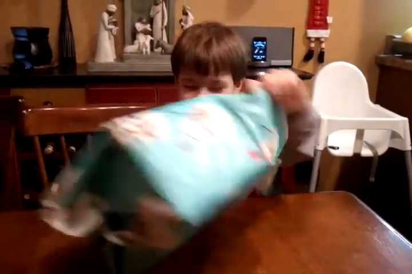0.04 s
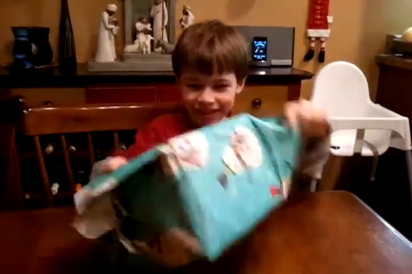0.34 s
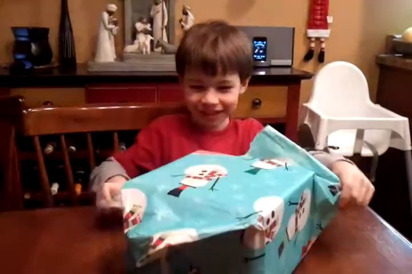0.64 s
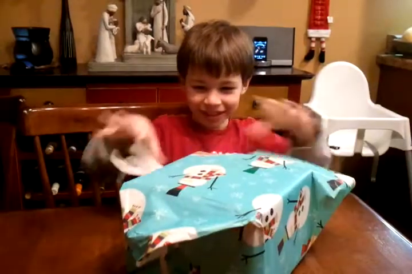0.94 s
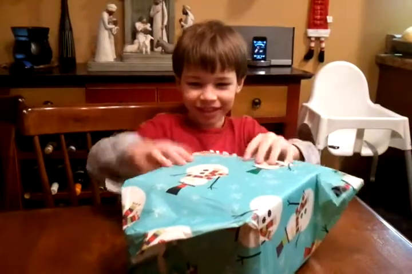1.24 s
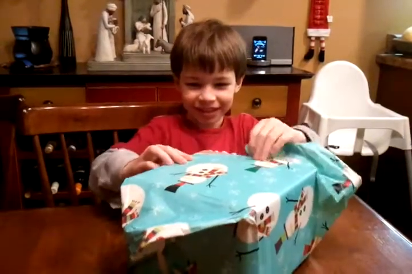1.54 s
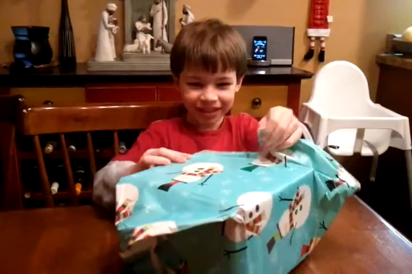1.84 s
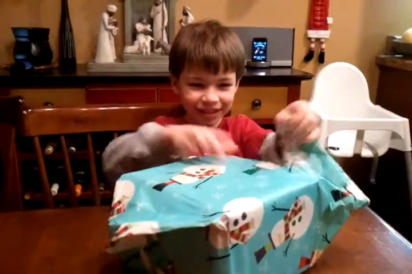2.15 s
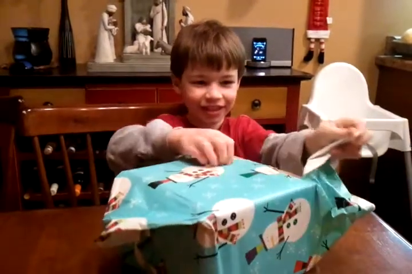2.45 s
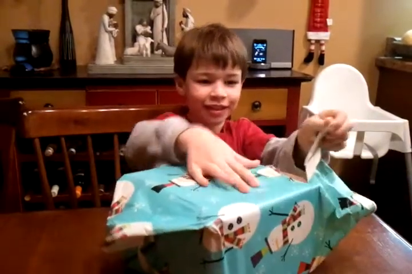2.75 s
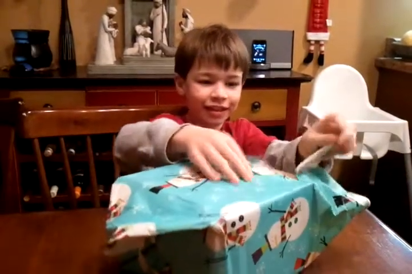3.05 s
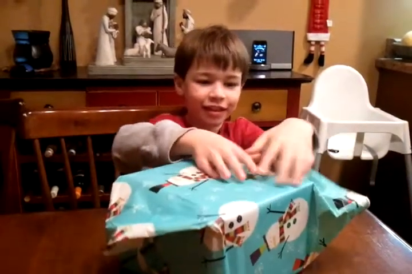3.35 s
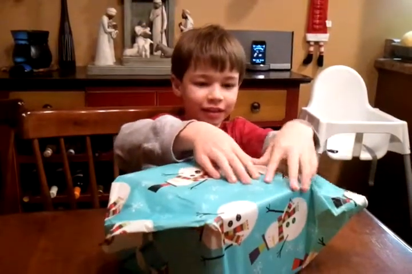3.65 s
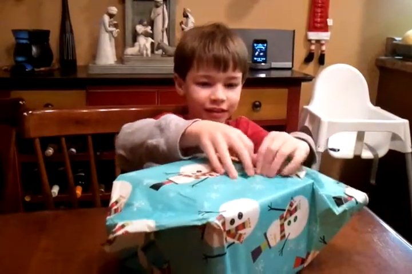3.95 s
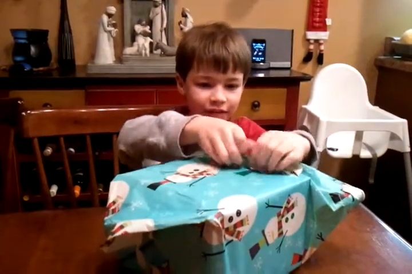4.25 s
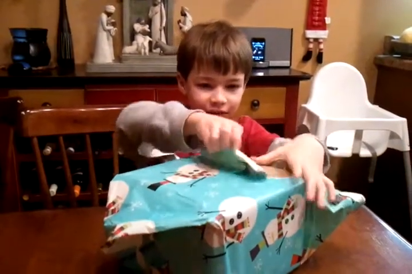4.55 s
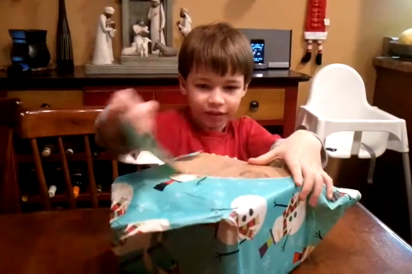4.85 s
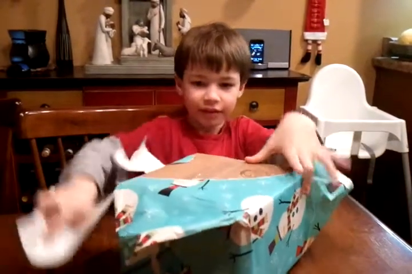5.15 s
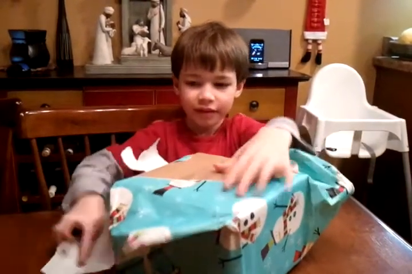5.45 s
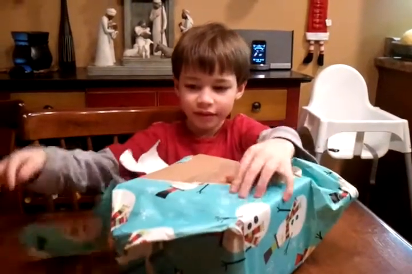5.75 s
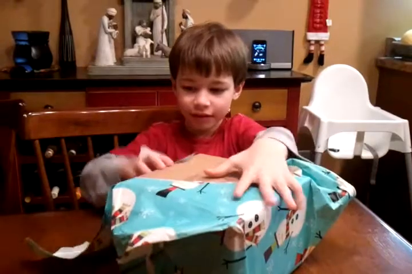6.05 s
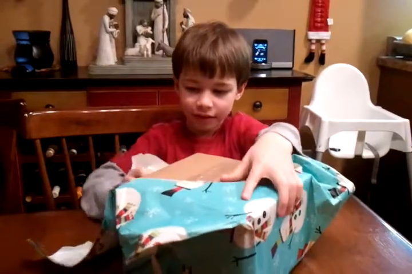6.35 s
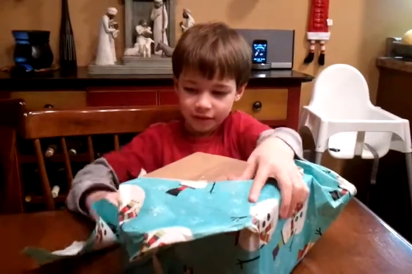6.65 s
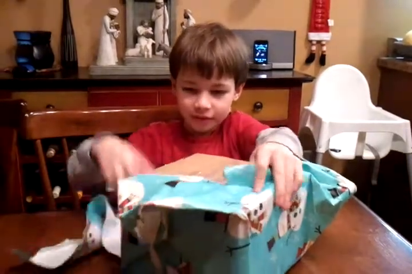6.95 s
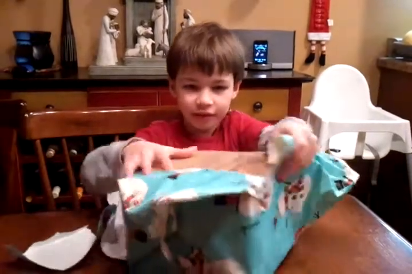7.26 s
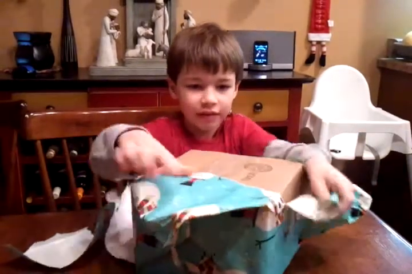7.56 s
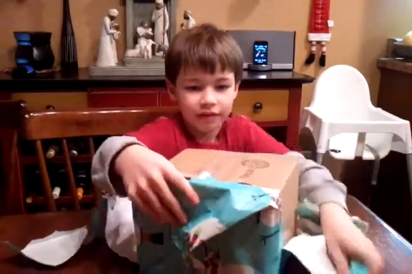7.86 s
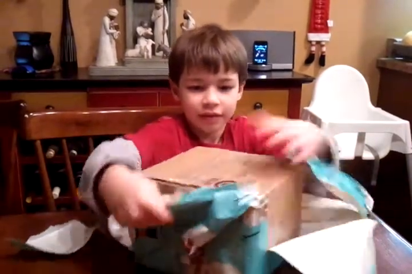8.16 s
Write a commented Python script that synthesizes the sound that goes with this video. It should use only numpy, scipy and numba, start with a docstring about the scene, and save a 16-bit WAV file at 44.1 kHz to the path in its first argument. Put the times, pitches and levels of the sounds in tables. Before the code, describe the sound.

Wrapping paper is torn off a cardboard box on a wooden table, heard fairly close in a room with a short ring. Rips fill the first 0.7 seconds, with a hollow knock at about 0.3. From 1 to 4 seconds the paper crinkles and pops between shorter tears, while the box bumps lightly and rubs on the tabletop. Near 3 seconds fingertips give three tiny, faint squeaks. A long tear builds from 4.3 seconds and peaks around 5.3, over the low groan of the sliding box. Softer rustling follows. From 6.4 to 8.2 seconds come the loudest pops and several strong rips, with a very sharp crack near 6.9. A last short push and a knock end it at about 8.3 seconds. A faint low rumble and hum lie underneath throughout.

```python
"""A gift box is unwrapped on a wooden dining table, in a room that rings briefly. First a knock sets the
cardboard modes ringing and the paper rips, its fibres snapping in dense runs. Creases pop between
shorter rips; near 3 s fingertips squeak by stick-slip. A long tear follows from 4.3 s while the box
slides and the tabletop resonates. The loudest pops and more rips fill 6.4 to 8.2 s, and a last push and
knock end the scene. Throughout, a fast limiter holds down the loud peaks."""
import sys
import numpy as np
from scipy import signal
from scipy.fft import rfft, irfft
from scipy.io import wavfile
from scipy.ndimage import uniform_filter1d
from numba import njit

SR = 44100
rng = np.random.default_rng(int(sys.argv[2]) if len(sys.argv) > 2 else 0)


def int16_out(signal):
    """Quantize to a 16-bit WAV file."""
    q = np.round(np.clip(np.atleast_2d(signal).T, -1, 1) * 32767)
    wavfile.write(sys.argv[1], SR, q.astype(np.int16))


N = 369981

# Modes of the cardboard box. Each row: frequency in Hz, level in dB, time to decay 60 dB in seconds.
BOX_MODES = [(123.7, 3.5, 0.1), (136.3, 10.5, 0.074), (165, -6.5, 0.21), (217, 1, 0.082),
             (286.2, -1, 0.083), (352.5, 1, 0.064), (419, -4.5, 0.062), (532, -15, 0.17), (798, -2, 0.029),
             (1050, -2, 0.021), (1410, -1.5, 0.035)]
# Big creases popping and edges giving way.
# Each row: start in seconds, level in dB, relative level of the flexing sheet in dB.
BIG_CREASES = [(0.1424, 1, 7.5), (1.1366, -17, -2), (1.2384, -15, 1.5), (1.3437, -15, 1),
               (1.4143, -12.5, -3), (1.479, -5, -21), (1.766, -3, -1), (1.8032, -9, -5), (2.128, -4, -6),
               (2.2816, 5.5, -30), (2.4505, -1, -15), (2.5365, -13, 4.5), (2.778, -19, -5),
               (2.851, -10, -1), (2.8862, -2, -16), (3.129, -7, 2), (3.259, -16, 7.5), (3.943, -1, -11.5),
               (4.1376, -2, -4.5), (4.2604, -2.5, -17), (4.5638, 4.5, -28), (5.5774, -9, 2.5),
               (5.6528, -15.5, 6), (5.722, -28.5, 14), (5.945, -11, -8), (6.317, -7.5, -5),
               (6.3944, 6.5, -5), (6.5298, -3.5, -4), (6.844, -5, -20), (6.862, 13, -7.5),
               (6.9698, -1, -14), (7.3712, 0.5, -15), (7.4551, 7, -6.5), (7.5165, 5.5, -5),
               (7.6598, -3.5, 4), (8.078, -4.5, -4), (8.1045, 8, -4), (8.132, 5, -8), (8.1884, 5, -10)]


def amp(db):
    """Decibels to amplitude ratio."""
    return 10 ** (np.asarray(db) / 20)


def unit(x):
    """Normalisation to rms 1."""
    return x / np.sqrt(np.mean(x ** 2))


def add(track, start_s, sound):
    """Superposition of a sound on a track."""
    i = max(int(start_s * SR), 0)
    track[i:i + len(sound)] += sound[:N - i]


def band(x, hz, kind, order=2):
    """Butterworth filtering."""
    return signal.sosfilt(signal.butter(order, hz, kind, fs=SR, output="sos"), x)


def ring(x, response):
    """Convolution with an impulse response."""
    return signal.fftconvolve(x, response)[:N]


def colour(points, size=4096):
    """Minimum-phase impulse response of a spectrum of (Hz, dB) points, by folding the cepstrum."""
    hz, db = np.transpose(points)
    gain = amp(np.interp(np.log(np.fft.rfftfreq(size, 1 / SR) + 1), np.log(hz), db))
    cepstrum = irfft(np.log(gain))
    cepstrum[1:size // 2] *= 2
    cepstrum[size // 2 + 1:] = 0
    return irfft(np.exp(rfft(cepstrum)))


def drift(per_s):
    """Random modulation of rms 1, interpolated between independent values."""
    values = rng.standard_normal(N // 20)
    return unit(np.interp(np.arange(N) / SR * per_s, np.arange(len(values)), values))


def clicks(per_s, spread_db, even_s):
    """Poisson impulses, many small and a few large, levelled to a power near 1 over spans of even_s."""
    hits = (rng.random(N) < per_s / SR) * amp(spread_db * np.minimum(rng.exponential(size=N), 5))
    size = int(even_s * SR)
    power = uniform_filter1d(uniform_filter1d(hits ** 2, size), size)
    return hits / np.sqrt(np.maximum(power, 1e-4))


def background(rumble_db=-34, hum_hz=61, hum_db=-44.5):
    """The noise floor: broadband room rumble and a faint pure tone of mains hum."""
    # Spectrum of the quiet room. Each row: frequency in Hz, spectral density in dB.
    air_spectrum = [(25, 9.5), (45, 9), (90, 1.5), (200, -12), (500, -31.5), (2000, -8.5), (7000, -12.5)]
    rumble = unit(ring(rng.standard_normal(N), colour(air_spectrum)))
    hum = unit(np.sin(2 * np.pi * hum_hz * np.arange(N) / SR))
    return rumble * amp(rumble_db + 0.91 * drift(7.4)) + amp(hum_db) * hum


def room(x, direct_share, hops_per_s, spots, low_t60=0.37, high_t60=0.3):
    """Reverberation: the source wanders among spots, each with its own decaying reflections."""
    t = np.arange(int(.35 * SR)) / SR
    shares = np.array([drift(hops_per_s) for _ in range(spots)])
    shares /= np.linalg.norm(shares, axis=0)
    onset = 1 - np.exp(-t / 0.00043)
    wet = 0
    for share in shares:
        noise = rng.standard_normal(len(t))
        low = band(noise, 1600, "lowpass", order=1)
        tail = (low * amp(-60 * t / low_t60) + (noise - low) * amp(-60 * t / high_t60)) * onset
        wet = wet + ring(x * share, tail / np.linalg.norm(tail))
    return np.sqrt(direct_share) * x + np.sqrt(1 - direct_share) * wet


def push_envelope(ease_s=0.06, rub_db=-37):
    """Amplitude envelope of friction: each push ramps in and out above the light rubbing of hands."""
    # Pushes of the box over the table. Each row: start in seconds, length in seconds, level in dB.
    pushes = [(0.348, .3, -28), (0.76, 0.27, -30.5), (1.747, 0.12, -29), (2.364, 0.31, -32),
              (2.88, 0.26, -31.5), (3.515, .36, -29), (3.88, 0.33, -30), (4.55, 0.88, -33.5),
              (5.46, 0.14, -26.5), (6.662, 0.21, -24.5), (7.296, 0.67, -30.5), (8.303, 0.066, -20)]
    t = np.arange(N) / SR
    gain = np.full(N, amp(rub_db))
    for start, length, db in pushes:
        ramp = np.clip(np.minimum(t - start, start + length - t) / ease_s, 0, 1)
        gain = np.maximum(gain, amp(db) * ramp)
    return gain


def sliding(tabletop_db=-0.5):
    """Stick-slip friction drives the tabletop and the box, whose least damped modes groan most."""
    # Modes of the tabletop. Each row: frequency in Hz, level in dB, time to decay 60 dB in seconds.
    tabletop_modes = [(151.7, 2, .4), (287.1, -4, 0.43)]
    slips = clicks(per_s=500, spread_db=1.5, even_s=0.013)
    t = np.arange(int(.3 * SR)) / SR
    cardboard = sum((-1) ** k * amp(db - 60 * t / t60) * t60 ** 0.93 * np.sin(2 * np.pi * hz * t)
                    for k, (hz, db, t60) in enumerate(BOX_MODES))
    groan = band(ring(slips, cardboard), [110, 480], "bandpass")
    wood = sum(amp(db - 60 * t / t60) * np.sin(2 * np.pi * hz * t) for hz, db, t60 in tabletop_modes)
    return unit(unit(groan) + amp(tabletop_db) * unit(ring(slips, wood))) * push_envelope()


def squeaks(overtone_ratio=3.3, overtone_db=-7):
    """Stick-slip oscillation of a fingertip: an uneven pitch that rises as the finger speeds up."""
    # Skids on the glossy paper. Each row: start in seconds, pitch in Hz, level in dB.
    skids = [(2.974, 878, -29), (3.033, 1020, -24.5), (3.242, 1597, -31.5)]
    out, size = np.zeros(N), int(.055 * SR)
    for start, hz, db in skids:
        jitter = 0.074 * unit(band(rng.standard_normal(size), 300, "lowpass"))
        pitch = hz * (1 + np.linspace(-.04, .04, size) + jitter)
        phase = 2 * np.pi * np.cumsum(pitch) / SR
        tone = np.sin(phase) + amp(overtone_db) * np.sin(overtone_ratio * phase)
        add(out, start, amp(db) * unit(tone * np.hanning(size)))
    return out


def box_response(contact_ms, t):
    """Modal response: a short contact excites the high modes, and each spot weights them differently."""
    hz, db, t60 = np.transpose(BOX_MODES)[:, :, None]
    cycles = hz * contact_ms / 1000
    weight = amp(db + 1.1 * rng.standard_normal(hz.shape)) * cycles ** 2 / (1 + cycles ** 4)
    polarity = rng.choice([-1, 1], hz.shape)
    return np.sum(polarity * weight * np.sin(2 * np.pi * hz * t) * amp(-60 * t / t60), axis=0)


def knocks():
    """Impact excitation of the cardboard: a skidding hand chatters on, and the paper under it slaps."""
    # Hands on the box and the box on the table.
    # Each row: start in seconds, relative level in dB, contact time in ms, decay time of the scrape in ms.
    impacts = [(0.005, -11, 5.8, 13), (0.286, -1, 1.77, 10), (0.649, -11, 20, 1.9), (1.238, -17, 1.45, 2.8),
               (1.352, -15.5, 7.3, 2.6), (1.704, -19.5, 2.1, 5.6), (2.019, -26, 2, 6),
               (2.289, -6, 3.9, 6.3), (2.775, -19.5, 14, 3), (2.849, -18, 4, 10), (2.961, -16.5, 2.2, 3.8),
               (3.12, -8.5, 2.9, 31), (3.362, -18, 2.6, 3.2), (3.826, -10.5, 2.8, 17),
               (5.552, -16, 13, 1.9), (6.161, -20.5, 3.2, 33), (6.756, -18, 8.9, 22), (7.349, -12.5, 6, 2),
               (8.098, -19, 1.3, 13.5), (8.337, -5, 2.9, 4.1)]
    out, t = np.zeros(N), np.arange(int(.2 * SR)) / SR
    for start, db, contact_ms, scrape_ms in impacts:
        chatter = rng.standard_normal(len(t)) * np.exp(-1000 * t / scrape_ms)
        body = signal.fftconvolve(box_response(contact_ms, t), chatter)[:len(t)]
        flutter = rng.standard_normal(len(t)) * np.exp(-t / (0.014 + scrape_ms / 1000))
        slap = band(flutter, np.clip(2200 / contact_ms, 100, 5000), "lowpass")
        add(out, start, amp(db - 14) * (unit(body) + 0.34 * unit(slap)))
    return band(out, 66, "highpass")


def paper_radiation(fibres, sheet, split_hz=2200):
    """Radiation in two bands: the fibres give the treble, the flexing sheet the middle."""
    # Spectrum that the paper radiates. Each row: frequency in Hz, spectral density in dB.
    paper_spectrum = [(180, -39.5), (300, 4.5), (320, -7), (437, 1), (505, -10.5), (795, -2.5), (1170, -5),
                      (2280, -7.5), (5370, -1), (6700, -5), (8710, -1.5), (14700, -120)]
    response = colour(paper_spectrum)
    bright = band(response, split_hz, "highpass", order=4)
    dull = band(response, split_hz, "lowpass", order=4)
    return ring(fibres, bright / np.linalg.norm(bright)) + ring(sheet, dull / np.linalg.norm(dull))


def pull_envelope(start, rise_s, hold_s, sag_db=4.5, release_s=0.021, settle_db=-18, settle_s=.09):
    """Loading and relaxation: a pull builds, slackens while held and lets go; the sheet then settles."""
    t = np.arange(N) / SR - start
    held = np.clip((t - rise_s) / hold_s, 0, 1)
    after = np.maximum(t - rise_s - hold_s, 0)
    release = np.maximum(np.exp(-after / release_s), amp(settle_db) * np.exp(-after / settle_s))
    return np.clip(t / rise_s, 0, 1) * amp(sag_db * (.5 - held)) * release


def paper_levels(handling_db=-44.5, wander_db=3, sheet_above_db=4.5):
    """Incoherent sources add in power: pulls plus light handling give fibre and sheet levels in dB."""
    # Pulls that tear or crumple the paper. Each row: start, rise and hold in seconds,
    # level of the snapping fibres in dB, level of the flexing sheet relative to them in dB.
    pulls = [(0.0, 0.0078, 0.11, -24, -1.5), (0.057, .025, 0.091, -9, -6), (0.142, 0.025, .09, -13.5, -4.5),
             (0.288, 0.0043, .035, -28.5, 7), (0.33, 0.025, .07, -30.5, -3), (0.4, 0.12, 0.16, -13.5, -7),
             (0.709, 0.049, 0.15, -28, -3.5), (1.453, 0.038, 0.058, -18.5, -9),
             (1.706, 0.0058, 0.06, -24.5, -11), (1.761, 0.033, 0.085, -18, -7.5),
             (1.896, 0.029, 0.095, -16.5, -8.5), (2.114, 0.048, 0.16, -15, -10),
             (2.32, 0.048, 0.11, -20.5, -5.5), (2.525, 0.015, 0.032, -18.5, -4),
             (2.862, .03, 0.096, -28, -2.5), (3.022, 0.024, 0.018, -31.5, 8.5),
             (3.118, 0.015, .045, -18.5, -4.5), (3.256, 0.023, .02, -30, -13),
             (3.813, 0.015, 0.039, -22.5, -7.5), (4.056, 0.053, 0.086, -22, -7.5),
             (4.255, 0.0037, 0.012, -13, -8.5), (4.286, 0.29, 0.036, -18, -7.5),
             (4.596, 0.13, 0.46, -11, -12.5), (5.255, 0.087, 0.037, -8, -9.5),
             (5.421, 0.057, 0.025, -24, -4.5), (5.624, .08, 0.054, -42.5, 8), (6.108, 0.074, 0.6, -35.5, 0),
             (6.516, 0.046, 0.048, -4, -10), (6.644, .02, 0.052, -19.5, -15),
             (6.719, 0.022, 0.24, -25, -3.5), (7.026, 0.056, 0.23, -11.5, -10.5),
             (7.36, 0.028, 0.043, -18.5, -6), (7.507, 0.034, 0.14, -23.5, -6),
             (7.667, 0.15, .11, -9, -11.5), (8.123, 0.022, 0.68, -23, -6)]
    fibres = amp(handling_db + wander_db * drift(9)) ** 2
    sheet = fibres * amp(sheet_above_db) ** 2
    for start, rise_s, hold_s, db, sheet_db in pulls:
        power = (amp(db) * pull_envelope(start, rise_s, hold_s)) ** 2
        fibres += power
        sheet += power * amp(sheet_db) ** 2
    return 10 * np.log10(fibres), 10 * np.log10(sheet)


def pop(fade_s, tick):
    """Snap-through buckling: a crease flips with one sharp tick, then a few ms of shiver."""
    t = np.arange(int(.04 * SR)) / SR
    fade = np.exp(-t / fade_s)
    shiver = rng.standard_normal(len(t)) * fade
    shiver[2] += tick
    return shiver * np.sqrt(np.sum(fade ** 2) / np.sum(shiver ** 2))


def small_creases(fibre_db, per_s=11, scatter_db=5, sheet_db=-8):
    """A Poisson process of small pops, louder as the paper is worked harder; rows as in BIG_CREASES."""
    moments = np.flatnonzero(rng.random(N) < per_s / SR)
    db = -0.5 + 0.85 * fibre_db + scatter_db * rng.standard_normal(N)
    return [(i / SR, db[i], sheet_db) for i in moments]


def creases(fibre_db, lead_s=.008, lead_db=-13.5):
    """Buckling transients stand out of the rustle; each big crease gives a little just before it pops."""
    leads = [(start - lead_s, db + lead_db, sheet_db) for start, db, sheet_db in BIG_CREASES]
    fibres, sheet = np.zeros(N), np.zeros(N)
    for start, db, sheet_db in list(BIG_CREASES) + small_creases(fibre_db) + leads:
        stretch = amp(1.52 * max(db, 0))  # a big crease takes longer to flip
        size = amp(db) / np.sqrt(stretch)
        add(fibres, start, size * pop(fade_s=0.0017 * stretch, tick=1.77))
        # the heavier sheet swings on after the tick
        add(sheet, start, size * amp(sheet_db - 6.5) * pop(fade_s=0.0026 * stretch, tick=0.66))
    return paper_radiation(fibres, sheet)


def crackle(per_s, scatter_db=2.9, drift_db=-0.26, bands=9):
    """Shot noise: each fibre shakes its own patch of paper, whose colour drifts as the sheet bends."""
    snaps = clicks(per_s, spread_db=4.0, even_s=0.051)
    edges_hz = np.geomspace(150, 9000, bands + 1)
    out = 0
    for low, high in zip(edges_hz, edges_hz[1:]):
        polarity = rng.choice([-1, 1], N)
        share = amp(scatter_db * rng.standard_normal(N) + drift_db * drift(25))
        out = out + band(snaps * polarity * share, [low, high], "bandpass")
    # as strong within these bands as white noise of rms 1
    return unit(out) * np.sqrt(edges_hz[-1] / (SR / 2))


def tearing(fibre_db, sheet_db):
    """Acoustic emission from fracture: the harder the pull, the more fibres snap each second."""
    run = crackle(per_s=3500 * amp(.55 * (fibre_db + 15)))
    return paper_radiation(run * amp(fibre_db), run * amp(sheet_db))


def scene():
    """Superposition in the room: creases and box send a larger share of direct sound than the tearing."""
    fibre_db, sheet_db = paper_levels()
    rips = room(tearing(fibre_db, sheet_db), direct_share=0.4, hops_per_s=260, spots=8)
    box = room(knocks() + sliding() + squeaks(), direct_share=0.78, hops_per_s=12, spots=3)
    air = background()
    pops = room(creases(fibre_db), direct_share=0.57, hops_per_s=1600, spots=6)
    return (rips + pops + box + air)[None]


@njit
def peak_follower(x, attack, release):
    """Envelope detection: the level jumps up to each peak and sinks slowly."""
    out, level = np.empty(len(x)), 0.
    for i in range(len(x)):
        level += (abs(x[i]) - level) * (attack if abs(x[i]) > level else release)
        out[i] = level
    return out


def record(dry, converter_hz=7020, offset=-0.27, ceiling=0.70, release_s=0.08, rail=0.74, top_hz=15800):
    """Peak limiting after a narrow-band converter with a steady offset: sound and offset duck alike."""
    x = signal.sosfilt(signal.ellip(6, .4, 38, converter_hz, fs=SR, output="sos"), dry[0])
    x = band(x, 9000, "lowpass", order=16) + offset
    envelope = peak_follower(x, 0.66, 1 / (release_s * SR))
    duck = band(1 - ceiling / np.maximum(envelope, ceiling), 1100, "lowpass")
    # the limiter looks only a third of a millisecond ahead, so the sharpest ticks still touch the rail
    delayed = np.concatenate([np.full(14, offset), x[:-14]])
    limited = np.clip(delayed * (1 - duck), -rail, rail)
    return signal.sosfilt(signal.ellip(8, .2, 70, top_hz, fs=SR, output="sos"), limited)[None]


dry = scene()
out = record(dry)
int16_out(out)
```